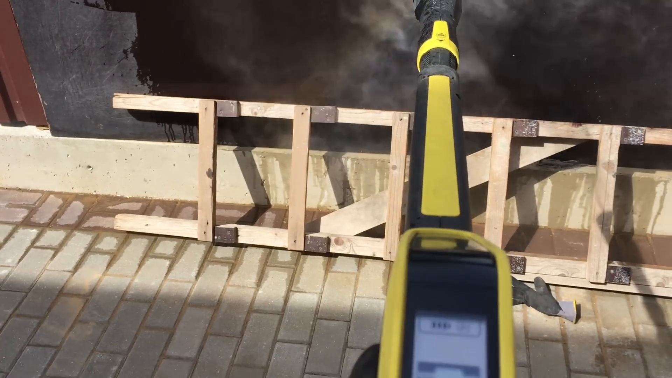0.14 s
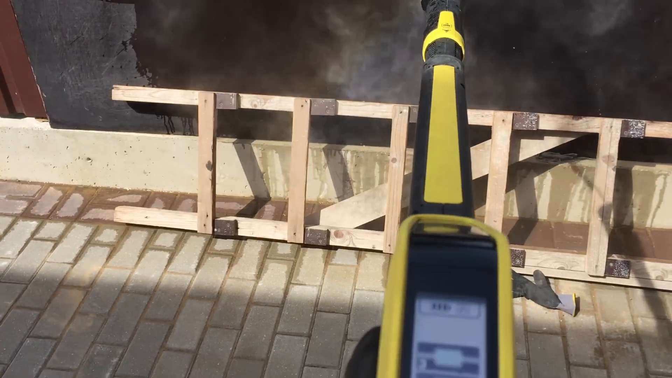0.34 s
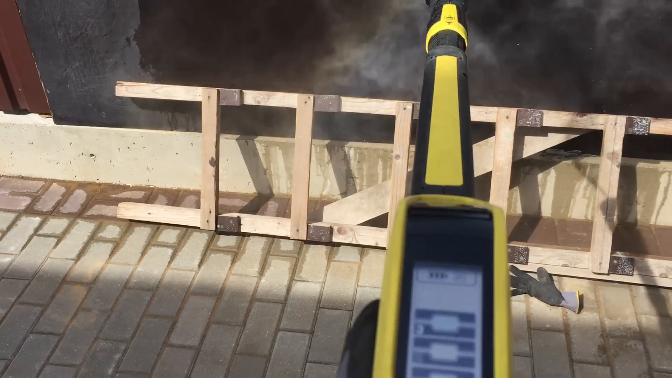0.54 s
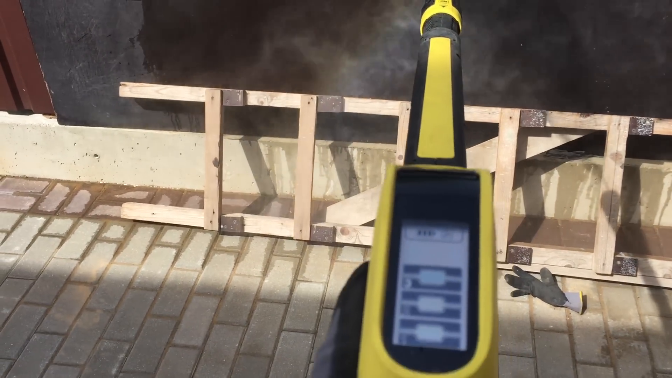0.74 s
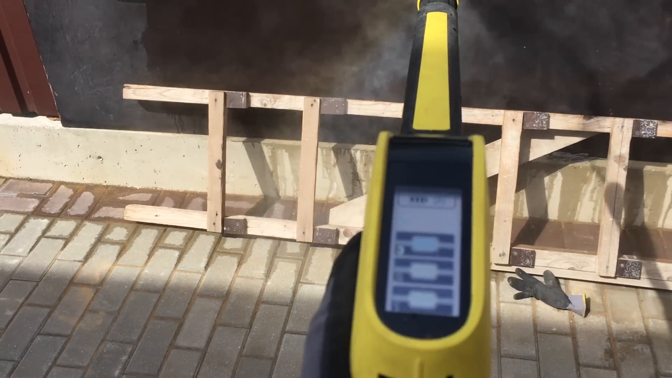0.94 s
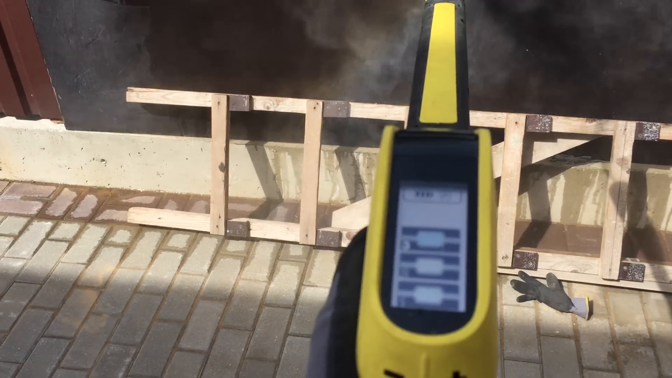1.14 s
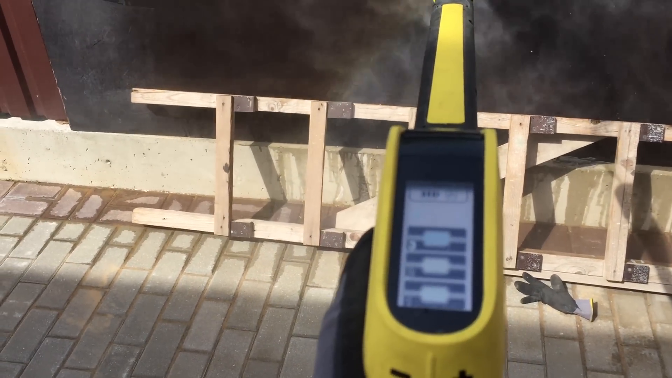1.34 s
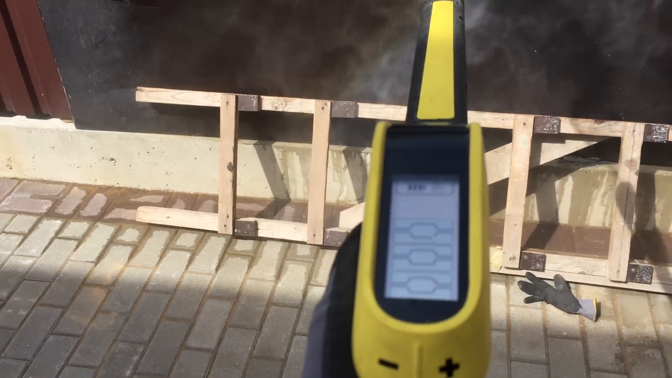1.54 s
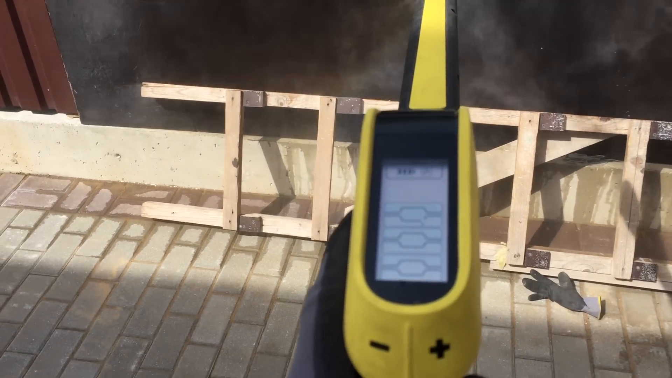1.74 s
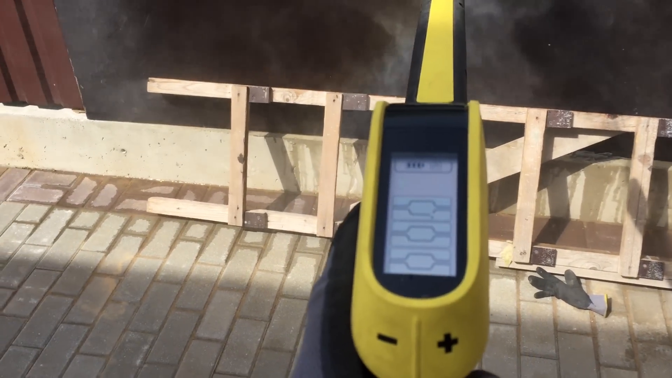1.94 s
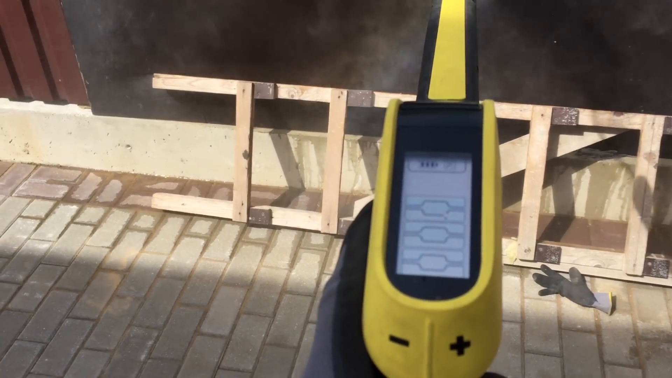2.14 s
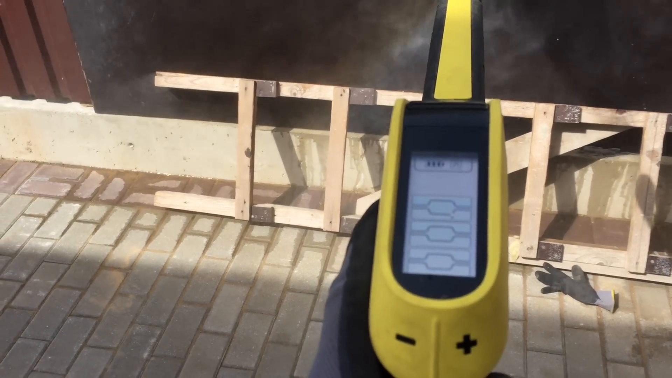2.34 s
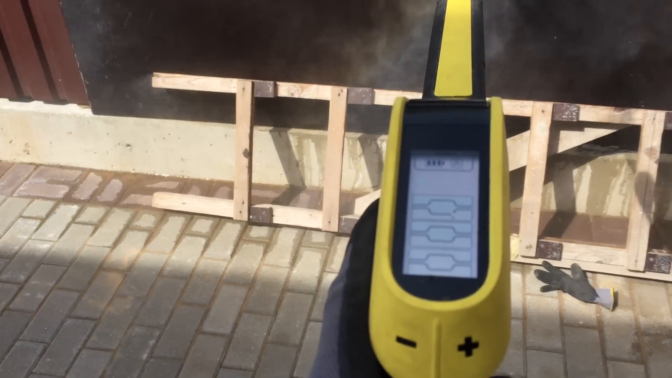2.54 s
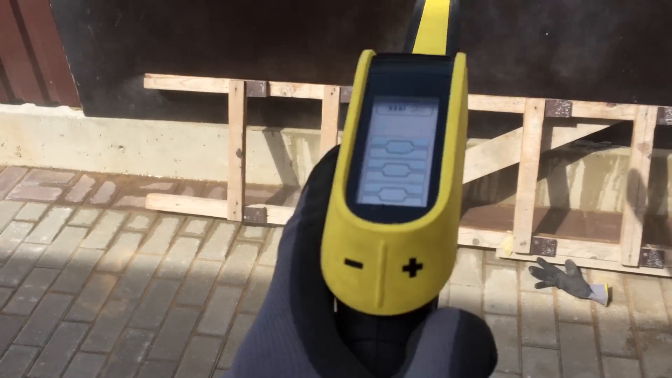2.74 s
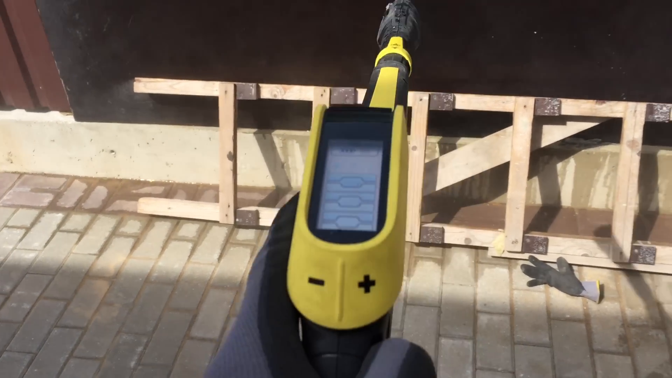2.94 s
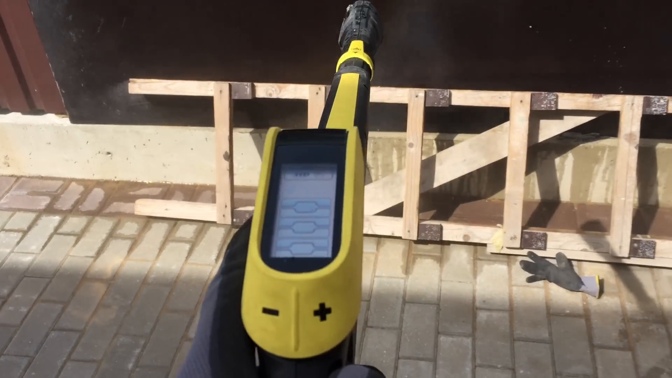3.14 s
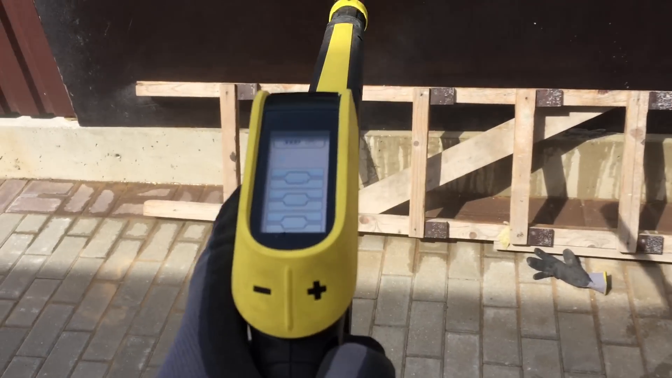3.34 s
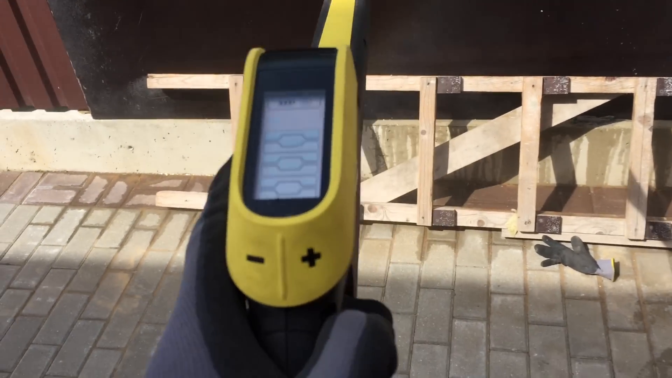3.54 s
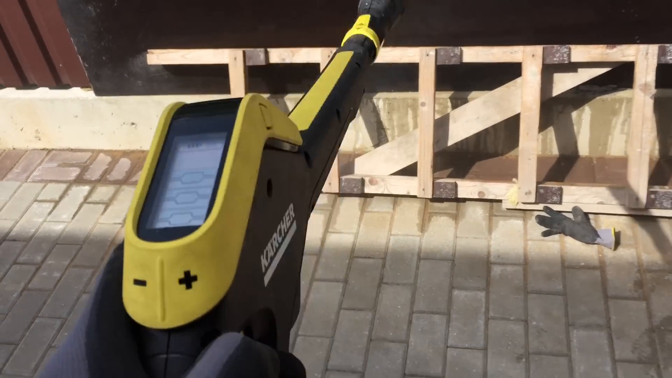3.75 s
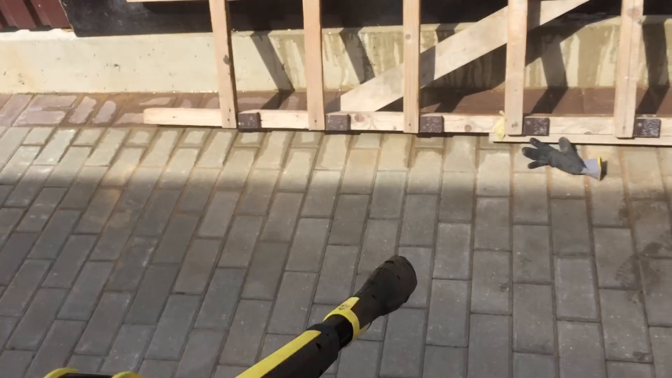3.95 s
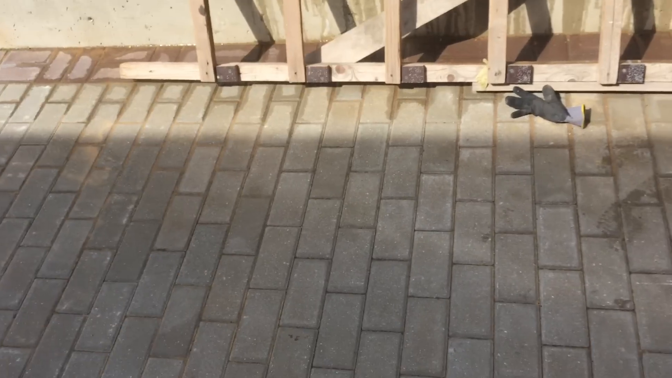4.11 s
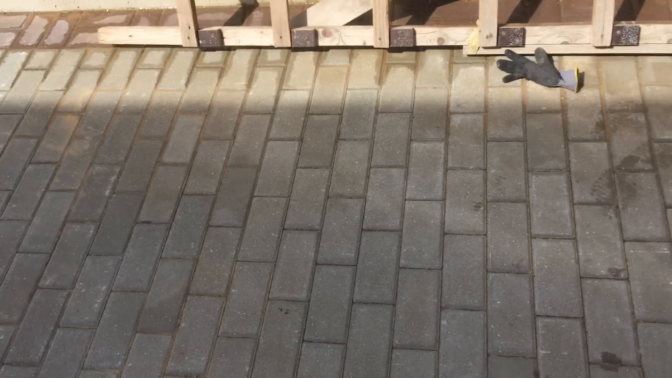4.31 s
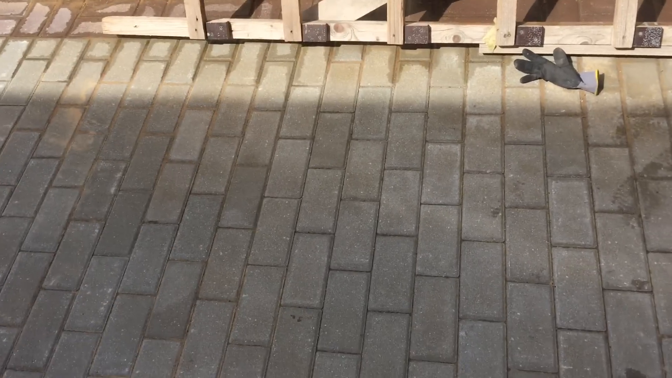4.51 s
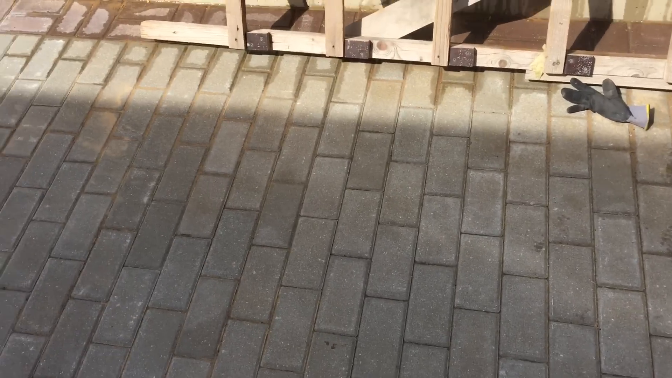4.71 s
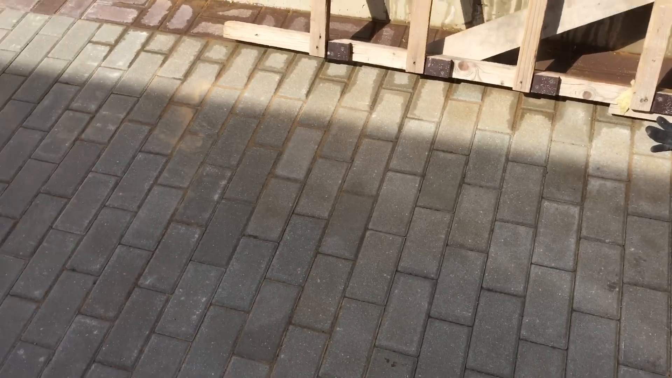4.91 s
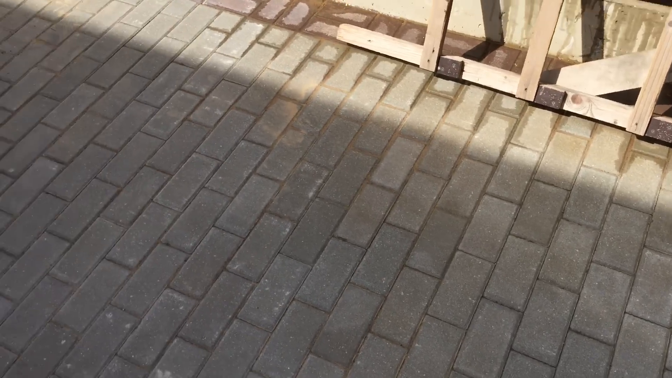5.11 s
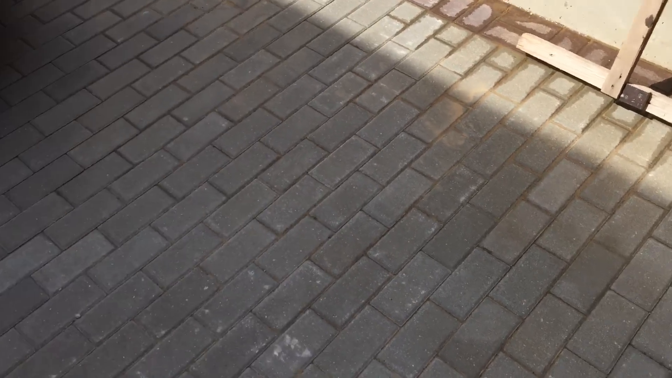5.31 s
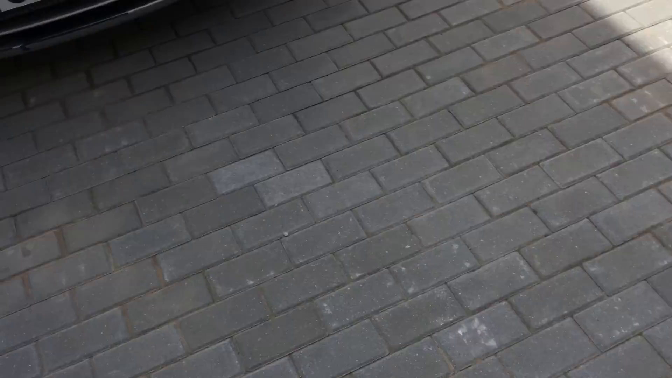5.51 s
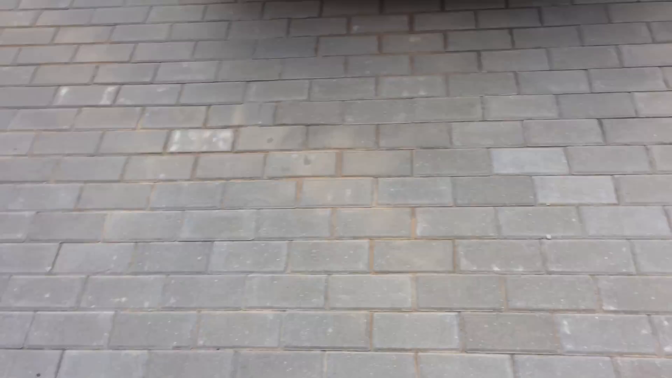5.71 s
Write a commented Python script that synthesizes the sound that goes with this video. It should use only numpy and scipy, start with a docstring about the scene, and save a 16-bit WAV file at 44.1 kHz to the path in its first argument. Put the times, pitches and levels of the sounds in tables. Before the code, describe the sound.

From the start, a pressure washer sprays a wall close to the microphone: a loud roar of water with a bright hiss, over a humming pump motor. The nozzle's low throb quickens and the sound grows slightly during the first second, then holds steady. At 2.8 seconds the trigger snaps shut with a sharp plastic clack and the spray cuts off. A dull click stops the motor at 2.9 seconds, leaving a brief low rumble and a thin fizzle of water that dries up by 3.5 seconds. From 3.4 to 5.5 seconds come soft hand thumps on the microphone and light knocks of the wand and hose, with faint sleeve swishes and shoe scuffs between 4.2 and 4.8 seconds. A clearer clack sounds at 5.2 seconds, and a shoe scrapes gritty paving at 5.7 seconds. The yard adds a slight, short echo over a very faint outdoor background.

```python
"""Pressure washer in a paved yard

A jet of water roars and hisses on a wall, the pump motor hums, and the nozzle throbs faster as the
pressure builds. The trigger valve snaps shut, a switch clicks the motor off and the last water fizzles
out of the lance, the long spray tube. Then the lance is lowered: soft handling thumps, rustling
sleeves, a clack and a shoe scraping on the paving."""
import sys
import numpy as np
from scipy import signal
from scipy.fft import rfft, irfft, next_fast_len
from scipy.io import wavfile
from scipy.ndimage import map_coordinates

SR = 44100
rng = np.random.default_rng(int(sys.argv[2]) if len(sys.argv) > 2 else 0)


def unload_audio(sound):
    """Save the sound as a 16-bit wav file, at the path given as the first command line argument."""
    columns = np.transpose(np.atleast_2d(sound))
    # keep every value between -1 and 1, then stretch to whole-number steps
    steps = np.round(np.clip(columns, -1, 1) * 32767)
    wavfile.write(sys.argv[1], SR, steps.astype(np.int16))


N = 254456
T = np.arange(N) / SR
SHUT_S, STOP_S = 2.808, 2.92  # the valve closes, the motor cuts out


def amp(db):
    """Turn decibels into a gain."""
    return 10 ** (np.asarray(db) / 20)


def unit(x):
    """Scale a signal to an average (rms) level of 1."""
    return x / np.sqrt(np.mean(x ** 2) + 1e-20)


def along(points, hz):
    """Read between (frequency, value) points, with octaves evenly spaced."""
    freqs, values = np.transpose(points)
    return np.interp(np.log(hz + 1), np.log(freqs + 1), values)


def wobble(rate):
    """A smooth random curve through `rate` new values a second."""
    return map_coordinates(rng.standard_normal(int(N * rate / SR) + 4), [T * rate])


def filtered(x, response):
    """Turn each frequency in x up or down by the gain response(hz)."""
    size = next_fast_len(N + SR // 4)
    return irfft(rfft(x, size) * response(np.fft.rfftfreq(size, 1 / SR)), size)[..., :N]


def coloured(x, colour, tilt_db=0, dull_hz=SR):
    """Give x a tone colour, add tilt_db per octave above 500 Hz and muffle it above dull_hz."""
    def response(hz):
        level_db = along(colour, hz) + tilt_db * np.log2(np.maximum(hz, 500))
        return unit(amp(level_db) / np.hypot(1, (hz / dull_hz) ** 6))
    return filtered(x, response)


def noise(colour, tilt_db=0, dull_hz=SR):
    """Steady noise with a tone colour, at level 1."""
    return unit(coloured(rng.standard_normal(N), colour, tilt_db, dull_hz))


def dying(start, fade_s):
    """Stay at 1 until start, then fall 60 dB every fade_s seconds."""
    return np.exp(-np.log(1000) * np.maximum(T - start, 0) / fade_s)


def tones(hz, multiples, drift):
    """Tones at multiples of one rate, each drifting a little out of step."""
    turn = 2 * np.pi * np.cumsum(hz) / SR
    return np.sqrt(2) * sum(amp(db) * np.sin(k * turn + drift * wobble(10) + rng.uniform(0, 2 * np.pi))
                            for k, db in multiples)


def missing_pressure(build_s=.57):
    """How much pressure the hose still lacks: 1 at the start, settling to 0."""
    return np.exp(-T / build_s)


# Tones of the throbbing nozzle: multiple of the throb rate, level/dB
THROB_TONES = [(1, 0.5), (1.61, -3), (2.6, -16.5)]
# Tone colour of spray hitting the wall, also used for the pump's rattle and rumble: f/Hz, level/dB
ROAR_COLOUR = [(25, -24), (60, -3.5), (140, 0), (195, 9.5), (260, 4), (340, 3), (450, -6), (560, -2),
               (850, 0.5), (1200, -2), (1500, 0), (2150, -1.5), (2900, -4), (5000, -35.5)]
# Tone colour of the fine drops: f/Hz, level/dB
HISS_COLOUR = [(1500, -28.5), (2500, -6), (3200, 0), (4100, 0), (4950, -4.5), (5500, -2), (6700, -2.5),
               (7700, -5.5), (9000, -3.5), (9900, -5), (10450, -10.5), (11200, -6), (13500, -6),
               (16000, -8)]
def jet():
    """The nozzle's throb, the roar on the wall and the hiss of drops all grow with the pressure."""
    missing = missing_pressure()
    throb_hz = 76.8 - 19.8 * missing
    throb = amp(-32 - 9.5 * missing) * tones(throb_hz, THROB_TONES, drift=.16) * dying(SHUT_S, .25)
    pulsing = 1 + .08 * np.sin(2 * np.pi * np.cumsum(throb_hz) / SR)
    roar = amp(-24.5 - 3 * missing + .45 * wobble(14)) * noise(ROAR_COLOUR)
    hiss = amp(-25.5 - 1.74 * missing + .3 * wobble(18) + .7 * wobble(600)) * noise(HISS_COLOUR)
    spray = pulsing * (roar * dying(SHUT_S, .2) + hiss * dying(SHUT_S, .21))
    # the wall throws the sound back, by a path that shifts as the hand sways
    delay_s = .0075 + .00005 * wobble(1.5)
    return throb + spray + .12 * map_coordinates(spray, [(T - delay_s) * SR])


# Hum of the pistons: multiple of the motor's turning rate, level/dB
PISTON_TONES = [(3, -12), (5, -11.5), (6, 0.5), (7, -14.5), (11, -20.5), (12, -12.5), (17, -20),
                (24, -18.5)]
def pump(fan_blades=13, mains_hz=100):
    """Pistons, fan and mains hum. The motor slows under load, stalls at the shut valve and cuts out."""
    missing = missing_pressure()
    stalled_s = np.clip(T - SHUT_S, 0, .2)
    motor_hz = 46.79 + missing - 11 * stalled_s
    piston_gain = amp(-31.5 - 5 * missing + 1.3 * wobble(16)) * dying(SHUT_S, 1.2)
    pistons = piston_gain * tones(motor_hz, PISTON_TONES, drift=.14)
    fan = amp(-27.5 - 109.5 * stalled_s) * tones(motor_hz, [(fan_blades, 0)], drift=.08)
    mains = amp(-42) * tones(np.full(N, mains_hz), [(1, 0)], drift=.2)
    # the pistons strain against the shut valve for a moment
    rattle = amp(-30) * noise(ROAR_COLOUR, tilt_db=-3.5) * np.clip((T - SHUT_S) / .07, 0, 1)
    # the motor coasts to rest with a low rumble
    coasting = amp(-38) * noise(ROAR_COLOUR, dull_hz=290) * (T > STOP_S) * dying(STOP_S, .63)
    return (pistons + fan + mains + rattle) * dying(STOP_S, .088) + coasting


# Tone colour of faraway outdoor noise: f/Hz, level/dB
DISTANT_COLOUR = [(25, 1.5), (100, 1.5), (300, -3), (470, -7.5), (1100, -6), (2400, -12), (4900, -16.5),
                  (15500, -26)]
# Tone colour of air or a hand brushing the microphone: f/Hz, level/dB
RUMBLE_COLOUR = [(15, -18.5), (30, -4.5), (70, 5.5), (180, -8), (300, -23), (700, -46.5), (2000, -90.5)]
def outdoors():
    """A faint faraway wash, and light air on the microphone."""
    return amp(-69) * noise(DISTANT_COLOUR) + amp(-66 + 2.2 * wobble(25)) * noise(RUMBLE_COLOUR)


def cracks(hits, colour):
    """Each hit on plastic is a burst of noise that dies away quickly."""
    out = np.zeros(N)
    for start, db, fade_s, tilt in hits:
        burst = rng.standard_normal(N) * (T >= start) * dying(start, fade_s)
        out += amp(db - 5.5) * coloured(burst, colour, tilt)
    return out


# Hard hits inside the valve: t/s, level/dB, fade time/s, brightness/(dB per octave)
VALVE_CLACKS = [(2.8015, -9.5, .012, -2.5), (2.8049, 3, .016, -2), (2.8225, -14.5, .012, -3)]
# Tone colour of the valve: f/Hz, level/dB
VALVE_COLOUR = [(100, -16.5), (450, -10), (800, -14.5), (1080, -5), (1270, -1), (1700, -3), (2300, -12),
                (4400, -7.5), (7000, -16.5), (15000, -22.5)]
# Ringing notes of the spray gun's shell: f/Hz, level/dB, fade time/s
SHELL_NOTES = [(1280, -10, 0.07), (1420, -14.5, 0.035), (1744, -12, .03)]
def trigger():
    """The valve chatters shut, and its hardest hit rings the plastic shell."""
    hardest_s = VALVE_CLACKS[1][0]
    since = np.maximum(T - hardest_s, 0)
    ring = sum(amp(db) * np.sin(2 * np.pi * hz * since) * dying(hardest_s, fade_s)
               for hz, db, fade_s in SHELL_NOTES)
    return cracks(VALVE_CLACKS, VALVE_COLOUR) + ring


def ringing_noise(peaks):
    """Noise gathered around a few pitches, each given as (frequency, width, level)."""
    def response(f):
        return sum(amp(db) / (1 + ((f - hz) / width) ** 2) for hz, width, db in peaks)
    return unit(filtered(rng.standard_normal(N), response))


# Tone colour of the last thin stream: f/Hz, level/dB
FIZZLE_COLOUR = [(200, -0.5), (300, -4.5), (650, -1.5), (1700, -2), (2500, -4), (3900, -8.5), (5800, -5.5),
                 (7500, -10.5), (9400, -9), (9900, -14), (10900, -14.5), (11900, -9.5), (14000, -13.5),
                 (16000, -13.5)]
# Notes at which the lance rings like a pipe: f/Hz, width/Hz, level/dB
PIPE_NOTES = [(684, 50, 8.5), (1100, 40, 1.5), (1480, 30, 4.5), (2180, 140, 2.5), (4930, 50, -4),
              (5680, 110, 3.5), (6300, 70, -2.5), (6900, 70, -4), (7470, 60, -8), (8810, 110, -7),
              (9350, 120, -4), (12100, 120, -7)]
def fizzle(rise_s=.087, hold_s=.18, fall_db_per_s=37, empty_s=3.44):
    """The last pressure pushes out a spitting stream that swells, dwindles and runs dry."""
    since = T - SHUT_S
    level_db = -44 - fall_db_per_s * np.maximum(since - rise_s - hold_s, 0)
    flow = np.clip(since / rise_s, 0, 1) * dying(empty_s, .2)
    hollow = ringing_noise(PIPE_NOTES)
    # the emptier the lance, the more its notes stand out
    emptiness = np.clip(since / .47, 0, 1)
    stream = amp(-.5 - 3.5 * emptiness) * noise(FIZZLE_COLOUR) + amp(-3.5) * emptiness * hollow
    return flow * amp(level_db + 1.5 * wobble(300)) * stream


# The pressure switch's click (first row), then lance and hose knocks:
# t/s, level/dB, fade time/s, brightness/(dB per octave)
CLICK_AND_KNOCKS = [(2.907, -18.5, .05, -5.5), (3.44, -41.5, .08, -4.5), (3.454, -37, 0.085, -6.5),
                    (3.722, -46, .035, -4.5), (3.974, -54, 0.02, -1), (4.062, -58, 0.043, 3),
                    (4.191, -35.5, 0.01, 3), (4.439, -50, 0.0166, 0.5), (5.192, -21, 0.03, 0.5),
                    (5.202, -33, 0.13, -.5)]
# Tone colour of the click and the knocks: f/Hz, level/dB
PLASTIC_COLOUR = [(88, -18.5), (150, 2.5), (373, -8), (860, -4), (1220, -11.5), (2360, -12.5), (3620, -17),
                  (6470, -16.5), (10700, -24), (15500, -27.5), (17000, -45)]
def switch_and_lance():
    """The pressure switch gives a dull click as the motor cuts out, then the lance and hose knock."""
    return cracks(CLICK_AND_KNOCKS, PLASTIC_COLOUR)


# Soft bumps of the hand: t/s, level/dB, f/Hz
HAND_BUMPS = [(3.398, -39, 72), (3.46, -35, 170), (3.484, -39.5, 207), (3.58, -41, 63.6),
              (3.729, -41.5, 142), (3.817, -39.5, 82), (3.885, -43, 90.8), (4.164, -39.5, 115.5),
              (4.193, -34.5, 84), (4.227, -35.5, 80), (4.479, -44.5, 95), (4.655, -43, 75),
              (4.736, -37.5, 60), (4.876, -42, 60), (5.042, -39, 156), (5.057, -39, 60), (5.179, -34.5, 95),
              (5.316, -38, 100), (5.347, -38.5, 76)]
def thumps(half_length_cycles=1.12):
    """Each bump rocks the microphone for a swing or two, over a faint rubbing."""
    out = np.zeros(N)
    rub = noise(RUMBLE_COLOUR, tilt_db=2)
    for middle, db, hz in HAND_BUMPS:
        near = abs(T - middle) < .1
        cycles = (T[near] - middle) * hz
        rocking = np.sin(2 * np.pi * cycles + rng.uniform(0, 2 * np.pi))
        out[near] += amp(db) * np.exp(-(cycles / half_length_cycles) ** 2) * (rocking + .35 * rub[near])
    return out


# Times when the grip shifts: start t/s, end t/s, level/dB
GRIP_SHIFTS = [(3.42, 3.99, -52.5), (4.427, 4.964, -55.5), (5.05, 5.53, -56)]
def grip(fade_s=.027):
    """Small random jolts rumble in the microphone while the hand shifts its hold."""
    effort = sum(amp(db) * np.clip(np.minimum(T - start, end - T) / fade_s, 0, 1)
                 for start, end, db in GRIP_SHIFTS)
    jolts = unit(amp(4.6 * wobble(30)))
    return effort * jolts * noise(RUMBLE_COLOUR)


def swell(middle, half_length):
    """A bell-shaped rise and fall, loudest at the time `middle`."""
    return np.exp(-((T - middle) / half_length) ** 2)


# Swishes of a sleeve: t/s, level/dB, half length/s, brightness/(dB per octave)
SLEEVE_SWISHES = [(4.19, -57.5, 0.048, -1.5), (4.357, -56.5, 0.1, -2.5), (4.44, -52.5, 0.037, -2.5),
                  (4.685, -60.5, 0.032, -1.5), (4.806, -51, 0.039, -0.5)]
# Tone colour of the fabric: f/Hz, level/dB
CLOTH_COLOUR = [(300, -33), (600, -11), (950, -4), (1400, -8), (2400, -0.5), (3500, -1), (7000, -4),
                (9300, -5), (10500, -9.5), (12000, -7), (15500, -12), (17000, -40)]
def sleeves():
    """Smooth fabric slides over itself as the arm comes down."""
    fibres = unit(amp(2 * wobble(400)))
    return fibres * sum(amp(db) * swell(middle, half_length) * noise(CLOTH_COLOUR, tilt)
                        for middle, db, half_length, tilt in SLEEVE_SWISHES)


# Scrapes of a shoe: t/s, level/dB, rise time/s, fade time/s, muffled above f/Hz
SHOE_SCRAPES = [(4.28, -51, 0.12, .24, 3100), (4.41, -53.5, 0.031, .15, 1800),
                (5.538, -51.5, 0.0044, 0.078, 1890), (5.698, -34, 0.0091, 0.51, 17000)]
# Tone colour of the grit: f/Hz, level/dB
GRIT_COLOUR = [(180, -21), (300, -12), (500, -21), (700, -11), (1030, -4), (1700, -6), (2400, -3.5),
               (4070, -0.5), (4900, -8), (6150, -6), (15500, -16)]
def shoe():
    """The sole drags grit across the paving stones."""
    grains = unit(amp(1.9 * wobble(700)))
    out = np.zeros(N)
    for start, db, rise_s, fade_s, dull_hz in SHOE_SCRAPES:
        drag = np.clip((T - start) / rise_s, 0, 1) * dying(start + rise_s, fade_s)
        out += amp(db) * drag * noise(GRIT_COLOUR, dull_hz=dull_hz)
    return grains * out


# Faint rubs: t/s, half length/s, level/dB, f/Hz, width/Hz
THIN_RUBS = [(4.36, 0.066, -54, 2500, 600), (4.624, .2, -69, 2520, 200), (4.685, .028, -60, 544, 90)]
def rubs():
    """Something rubs with a thin hiss around one pitch, swelling and fading."""
    return sum(amp(db) * swell(middle, half_length) * ringing_noise([(hz, width, 0)])
               for middle, half_length, db, hz, width in THIN_RUBS)


# How long the yard echoes at each pitch: f/Hz, fade time/s
ECHO_TIMES = [(100, .5), (250, 0.76), (600, 0.68), (2000, 0.55), (5000, 0.54), (14000, 0.2)]
def yard(x):
    """The walls answer with a short, blurred echo whose highest notes die first."""
    hz, t, spectrum = signal.stft(rng.standard_normal(SR * 3 // 4), SR, nperseg=256)
    fade = np.exp(-np.log(1000) * t / along(ECHO_TIMES, hz)[:, None])
    _, tail = signal.istft(spectrum * fade, SR, nperseg=256)
    delayed = np.pad(x, (SR // 200, 0))  # 5 ms
    return signal.fftconvolve(delayed, tail / np.linalg.norm(tail))[:N]


def scene():
    """Everything reaches one microphone, the same in both channels."""
    hits = trigger() + switch_and_lance()
    washer = jet() + pump()
    quiet_sounds = fizzle() + sleeves() + rubs() + shoe()
    echo = yard(amp(-19.5) * washer + amp(-18) * hits + amp(-24) * quiet_sounds)
    mono = washer + hits + quiet_sounds + echo + thumps() + grip() + outdoors()
    return np.array([mono, mono])


def record(dry):
    """The loudest peaks are rounded off and the very highest treble is cut."""
    ceiling, top_hz = .72, 15850
    rounded = dry / (1 + np.abs(dry / ceiling) ** 6) ** (1 / 6)
    return filtered(rounded, lambda hz: np.clip((top_hz - hz) / 200 + .5, 0, 1))


dry = scene()
out = record(dry)
unload_audio(out)
```